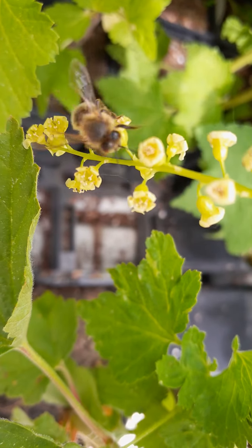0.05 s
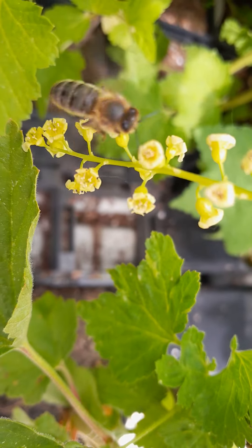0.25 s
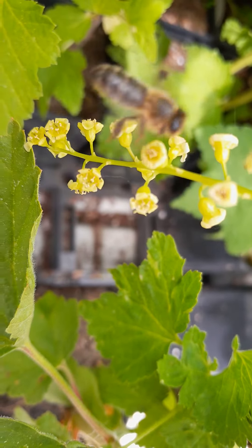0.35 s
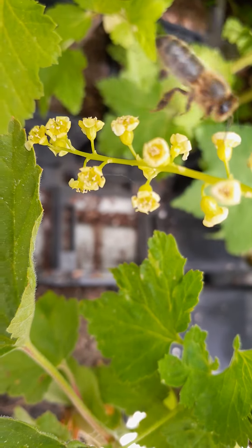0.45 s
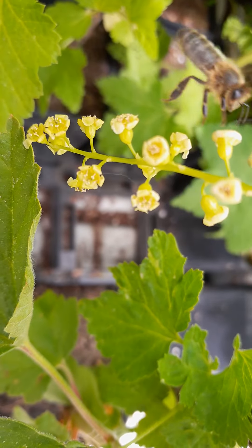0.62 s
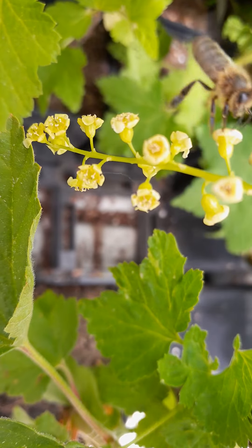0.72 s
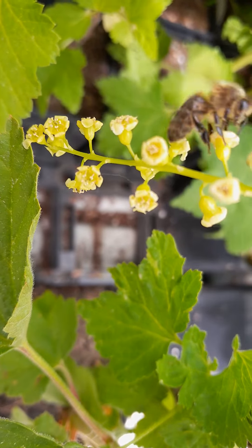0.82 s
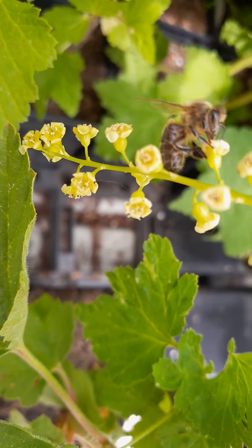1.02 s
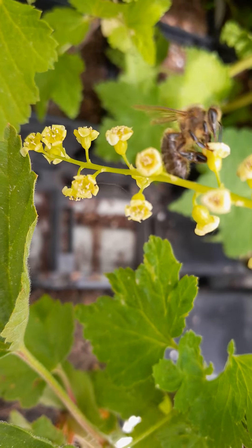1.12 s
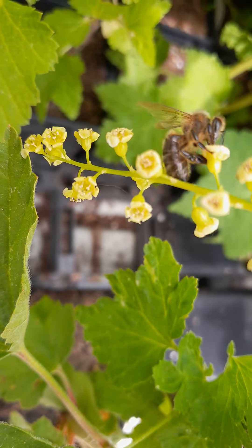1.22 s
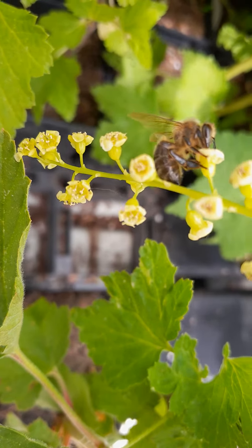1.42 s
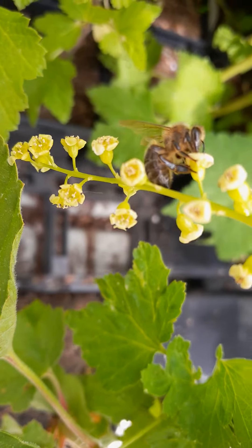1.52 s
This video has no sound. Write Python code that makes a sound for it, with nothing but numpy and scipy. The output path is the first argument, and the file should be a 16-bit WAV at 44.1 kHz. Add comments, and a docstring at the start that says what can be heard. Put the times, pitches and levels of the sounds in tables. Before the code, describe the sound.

A honeybee buzzes briefly up close on the left, with faint distant birds outdoors.

```python
"""A honeybee lifts off a flower, hovers for half a second right beside the left microphone and lands again.
Up close its wingbeats give a sawtooth buzz and blow a faint hiss over that microphone;
the right one, farther away, gets a thin buzz and little of the draught.
Far off to the right, birds whistle, tick and trill over a low outdoor rumble."""
import sys
import numpy as np
from scipy import signal
from scipy.fft import rfft, irfft
from scipy.io import wavfile

SR = 44100
rng = np.random.default_rng(int(sys.argv[2]) if len(sys.argv) > 2 else 0)


def transcribe(u):
    """Save the signal u as a 16-bit wav file named by the first command-line argument.

    u: samples, shape (n,) or (channels, n), limited to [-1, 1]; the rate is SR.
    q: integer samples, one column per channel.
    """
    v = np.clip(np.atleast_2d(u).T, -1, 1)
    q = np.round(v * 32767).astype(np.int16)
    wavfile.write(sys.argv[1], SR, q)


N = 68355
T = np.arange(N) / SR

# The bee's wingbeat. Each row: time in seconds, rate in Hz.
WINGBEAT = [(0.185, 247.8), (0.201, 251.9), (0.215, 245.6), (0.233, 270.4), (0.241, 252.9), (0.261, 260.3),
            (0.289, 257.1), (0.303, 244.8), (0.327, 262.2), (0.341, 266), (0.361, 250.7), (0.411, 257),
            (0.445, 244.7), (0.469, 264.8), (0.485, 246.4), (0.497, 259.2), (0.545, 253.4), (0.589, 259.5),
            (0.621, 256.7), (0.627, 248.9), (0.669, 259.6), (0.691, 247.7), (0.737, 254.2), (0.79, 249.3)]
# Buzz at the near microphone, with a last flick of the wings on landing.
# Each row: time in seconds, then levels of fundamental, octave and overtones in dB.
NEAR_BUZZ = [(.18, -87, -98, -105), (.192, -52, -55, -83), (.212, -51.5, -55, -88), (.228, -50, -56.5, -69),
             (.236, -45, -45.5, -73), (.248, -41.5, -46, -66), (.266, -39, -41.5, -58.5),
             (.286, -36.5, -41, -57), (.306, -41.5, -43.5, -55), (.342, -35, -41.5, -56.5),
             (.361, -40, -45.5, -64.5), (.378, -37, -41, -55), (.41, -35, -40.5, -57.5),
             (.448, -39, -43.5, -58), (.47, -37, -41.5, -56.5), (.49, -41.5, -44.5, -60),
             (.527, -39, -42.5, -56.5), (.575, -44, -45, -59.5), (.605, -43, -43.5, -56.5),
             (.628, -46.5, -47, -57.5), (.655, -41.5, -43.5, -56.5), (.703, -48.5, -47.5, -59.5),
             (.718, -47, -47.5, -59), (.742, -60, -47.5, -63), (.763, -78, -54, -72), (.797, -63, -55, -79),
             (.81, -68, -74, -92), (.82, -76, -56.5, -88), (.835, -76, -72, -90.5), (.87, -68.5, -75, -101),
             (.92, -100, -100, -110)]
# Its overtones. Each row: frequency in Hz, gain flying off in dB, gain turned to land in dB.
NEAR_OVERTONES = [(760, -2, -3.5), (1020, -6.5, -9), (1275, -7, -17), (1568, -1, -0.5), (1790, -9, -14),
                  (1990, -12, -16.5), (2320, -21.5, -21.5), (2575, -10.5, -10), (2780, -17, -19),
                  (3020, -20, -18), (3600, -59, -28)]
# Buzz at the far microphone. Each row: time in seconds, base level in dB.
FAR_BUZZ = [(.18, -106), (.195, -76), (.235, -83), (.278, -64.5), (.305, -78), (.335, -70), (.45, -75),
            (.6, -69), (.72, -70), (.8, -75), (.87, -81), (.92, -100)]
# Its partials. Each row: frequency in Hz, gain in dB.
FAR_PARTIALS = [(255, 5.5), (510, 0), (765, -8), (1020, -6), (1275, -5), (1530, -10), (1790, -14),
                (2300, -8.5), (2800, -25.5), (3600, -38)]
# Air blown over the near microphone. Each row: time in seconds, level in dB.
DRAUGHT = [(.18, -108), (.19, -63.5), (.23, -62), (.28, -59), (.41, -56), (.52, -57), (.67, -58),
           (.76, -60.5), (.875, -66), (.89, -73), (1.0, -84), (1.08, -100)]
# Brushes on the flower; a stalk-like tick and rustle.
# Each row: start in seconds, level in dB, decay in seconds.
BRUSHES = [(1.375, -65, 0.031), (1.406, -66.5, 0.052)]
STALK = [(1.468, -65, .002), (1.47, -82, .15)]
# Distant bird notes. Each row: start and length in seconds, first and target pitch in Hz,
# relative level in dB, warble depth in Hz.
WHISTLES = [(0.588, .13, 1900, 1994, -62.5, 151.2), (0.779, 0.11, 1760, 1840, -71, 109.7),
            (0.866, 0.066, 1900, 1956, -65.5, 79), (0.859, 0.15, 2294, 2260, -75.5, 119),
            (1.014, 0.079, 2048, 1940, -67, 35), (1.078, 0.085, 1895, 1699, -69, 70),
            (1.1, 0.051, 1960, 1941, -66, 30.17), (1.167, 0.089, 1790, 1588, -78.5, 48.7),
            (1.3, 0.1, 2420, 2155, -62, 40.6), (1.43, 0.036, 2258, 2110, -66, 39.6),
            (1.465, 0.037, 2100, 2200, -66.5, 60), (1.418, 0.12, 2365, 2706, -75, 80)]
# Sharp bird ticks. Each row: start in seconds, centre pitch in Hz, relative level in dB.
TICKS = [(.001, 5010, -59), (0.024, 5320, -59), (.043, 5270, -62), (0.064, 5340, -65), (0.12, 5800, -64),
         (0.316, 5700, -55.5), (0.326, 5430, -60), (0.91, 5320, -61.5), (0.938, 4860, -64),
         (0.953, 5080, -66)]
# Haze around the trill, and the outdoor rumble. Each row: time in seconds, relative level in dB.
TRILL_HAZE = [(1.45, -110), (1.468, -73), (1.51, -71), (1.55, -74)]
RUMBLE = [(0, -60), (.06, -61), (.17, -64.5), (.3, -64), (.55, -65.5), (.7, -59.5), (.83, -70.5),
          (.94, -62.5), (1.04, -67), (1.13, -64.5), (1.18, -74.5), (1.27, -72.5), (1.31, -66.5),
          (1.55, -65.5)]
# Noise spectra, from close by to far off. Each row: frequency in Hz, relative density in dB.
DRAUGHT_COLOUR = [(200, 16.5), (900, 8.5), (2000, -7), (3000, -12), (4500, -3), (6500, -4), (10000, 0),
                  (11100, 2), (11900, 6), (13100, 5), (14200, -5), (15700, 3)]
RASP_COLOUR = [(50, 3), (200, 11.5), (300, 14), (400, -17), (600, 2), (1200, 0.5), (1900, 1.5), (2900, -4),
               (3500, -9.5), (6000, -12.5)]
BRUSH_COLOUR = [(60, -0.5), (170, 1), (300, -2), (550, -11), (1200, -46), (4000, -44)]
STALK_COLOUR = [(1000, -15), (5000, 6), (12000, 5), (15700, 7)]
HAZE_COLOUR = [(2800, -20), (3800, 3), (5000, 1), (6500, -2), (7600, -15)]
RUMBLE_COLOUR = [(15, -15.5), (30, -21), (48, 0), (65, 1), (100, -4), (160, -12.5), (260, -18.5),
                 (500, -36), (1200, -48.5)]
AIR_COLOUR = [(40, 11.5), (250, 14), (500, 13), (1200, 6.5), (2000, 10.5), (3000, 0), (6000, 0),
              (15700, -3)]


def buzz_near(beats, partial, hz, turn_s=0.46, turning_s=0.12, full_stroke_s=0.261):
    """One partial of the wings' pressure sawtooth, close left; overtones shift as the bee turns to land."""
    fundamental_db, octave_db, upper_db = (curve(NEAR_BUZZ, column) for column in (1, 2, 3))
    turned = np.clip(.5 + (T - turn_s) / turning_s, 0, 1)
    colour_db = (1 - turned) * gain_at(NEAR_OVERTONES, hz) + turned * gain_at(NEAR_OVERTONES, hz, 2)
    shimmer_db = 1.46 * wander(rate_hz=79)
    overtone_db = upper_db + colour_db + shimmer_db
    if hz < 1100:  # low overtones swell partly with the fundamental
        overtone_db += 0.36 * (fundamental_db - upper_db)
    if hz > 1900:  # bright ones wait for the full stroke
        overtone_db -= 37 * np.clip((full_stroke_s - T) / 0.031, 0, 1)
    db = {1: fundamental_db, 2: octave_db}.get(partial, overtone_db)
    return amp(db) * np.sin(2 * np.pi * partial * beats)


def buzz_far(beats, partial, hz):
    """The same partial at the right microphone, where it fades and shifts in phase."""
    fading_db = 5.5 * wander(rate_hz=64)
    db = curve(FAR_BUZZ) + gain_at(FAR_PARTIALS, hz) + fading_db
    drift_cycles = 0.16 * wander(rate_hz=40)
    return amp(db) * np.cos(2 * np.pi * (partial * beats + drift_cycles))


def buzz(beats):
    """Fourteen harmonics of the wingbeat reach both microphones."""
    wing_hz = np.median(WINGBEAT, 0)[1]
    pair = np.zeros((2, N))
    for partial in range(1, 15):
        hz = partial * wing_hz
        pair += [buzz_near(beats, partial, hz), buzz_far(beats, partial, hz)]
    return np.sqrt(2) * pair


def draught(beats, far_db=-11):
    """Each wing stroke pushes an uneven puff of air at the microphones: a rasp with a fine hiss on top."""
    stroke = np.cos(2 * np.pi * beats)
    gusts = amp(2.0 * wander(rate_hz=740))
    hiss_gain = unit((1 + 0.18 * stroke) * gusts) * amp(curve(DRAUGHT))
    rasp_gain = unit(1 + 0.09 * stroke) * amp(curve(NEAR_BUZZ, 3) - 2.5)  # follows the overtones
    return np.array([amp(db) * (hiss_gain * noise(DRAUGHT_COLOUR) + rasp_gain * noise(RASP_COLOUR))
                     for db in (0, far_db)])


def landing():
    """Close on the left: a thin falling whistle as the wings stop, then rustles as the bee settles."""
    left = rustle(BRUSHES, BRUSH_COLOUR) + rustle(STALK, STALK_COLOUR)
    left += rough_tone(start_s=.87, length_s=.16, first_hz=11400, last_hz=10800, db=-84)
    return np.array([left, np.zeros(N)])


def rustle(bursts, colour):
    """Light touches on the flower: bursts of noise that die away."""
    envelope = sum(amp(db) * (T > start) * np.exp(-abs(T - start) / decay) for start, db, decay in bursts)
    return noise(colour) * envelope


def bird_whistle(length_s, first_hz, target_hz, db, warble_hz, slide_s=0.0392, rise_s=0.045, fall_s=0.0095):
    """A husky note slides towards its target pitch with a quick warble and a flutter in strength."""
    t = np.arange(0, length_s, 1 / SR)
    hz = target_hz + (first_hz - target_hz) * np.exp(-t / slide_s)
    hz += warble_hz * wander(rate_hz=170)[:len(t)]
    envelope = np.minimum(t / rise_s, 1) * np.minimum((length_s - t) / fall_s, 1)
    flutter = 1 + 0.29 * wander(rate_hz=270)[:len(t)]
    return amp(db) * unit(envelope * flutter * sine(hz))


def bird_tick(centre_hz, db, length_s=0.00344, sweep=0.38):
    """A downward chirp so steep that it sounds like a tick."""
    progress = np.arange(0, length_s, 1 / SR) / length_s
    hz = centre_hz * (1 + sweep * (1 - 2 * progress))
    return amp(db) * np.sin(np.pi * progress) * sine(hz)


def birds():
    """Distant song off to the right: whistles below, ticks and a rough trill above."""
    low = np.zeros(N)
    high = rough_tone(start_s=1.48, length_s=.06, first_hz=4400, last_hz=4150, db=-67)
    high += amp(curve(TRILL_HAZE)) * noise(HAZE_COLOUR)
    for start, *note in WHISTLES:
        add(low, start, bird_whistle(*note))
    for start, *note in TICKS:
        add(high, start, bird_tick(*note))
    return across_garden(low, left_db=-10) + across_garden(high, left_db=-11)


def across_garden(song, left_db, direct_db=-7, echo_db=-5, t60_s=0.47, echoes_per_s=1500):
    """Song arrives directly and as scattered echoes, different at each microphone."""
    t = np.arange(SR) / SR
    taps = rng.standard_normal((2, SR)) * (rng.random((2, SR)) < echoes_per_s / SR)
    taps *= np.exp(-np.log(1000) * t / t60_s)
    taps /= np.linalg.norm(taps, axis=1, keepdims=True)
    echoes = signal.fftconvolve(song[None], taps, axes=1)[:, :N]
    return (amp(direct_db) * song + amp(echo_db) * echoes) * amp([[left_db], [0]])


def outdoors(shared=0.85, air_db=-81, right_boost_db=3.5):
    """A swelling rumble, mostly shared by both microphones, and a thin steady hiss of open air."""
    rumble = np.sqrt(shared) * noise(RUMBLE_COLOUR)
    apart = np.sqrt(1 - shared) * np.array([noise(RUMBLE_COLOUR), noise(RUMBLE_COLOUR)])
    air = np.array([noise(AIR_COLOUR), amp(right_boost_db) * noise(AIR_COLOUR)])
    return amp(curve(RUMBLE)) * (rumble + apart) + amp(air_db) * air


def rough_tone(start_s, length_s, first_hz, last_hz, db, waver=.025):
    """A tone swells and fades, its pitch trembling as it glides."""
    progress = np.clip((T - start_s) / length_s, 0, 1)
    hz = (first_hz + (last_hz - first_hz) * progress) * (1 + waver * wander(rate_hz=170))
    return amp(db) * np.sin(np.pi * progress) * np.sqrt(2) * sine(hz)


def sine(hz):
    """A sine that follows a moving pitch."""
    return np.sin(2 * np.pi * np.cumsum(hz) / SR)


def amp(db):
    """Decibels to gain."""
    return 10 ** (np.asarray(db) / 20)


def unit(x):
    """Scales to rms 1."""
    return x / np.sqrt(np.mean(x ** 2) + 1e-20)


def curve(table, column=1):
    """One column of a time table, at every sample."""
    return np.interp(T, *np.transpose(table)[[0, column]])


def gain_at(spectrum, hz, column=1):
    """A spectrum's gain in dB, read on a log-frequency axis."""
    points_hz, db = np.transpose(spectrum)[[0, column]]
    return np.interp(np.log(hz + 1), np.log(points_hz), db)


def noise(colour):
    """Steady noise of a given spectrum."""
    gain = amp(gain_at(colour, np.fft.rfftfreq(N, 1 / SR)))
    return unit(irfft(rfft(rng.standard_normal(N)) * gain, N))


def wander(rate_hz):
    """Smooth random motion up to a rate."""
    gain = np.exp(-(np.fft.rfftfreq(N, 1 / SR) / rate_hz) ** 2)
    return unit(irfft(rfft(rng.standard_normal(N)) * gain, N))


def add(mix, start_s, sound):
    """Mixes a sound in at a time."""
    part = mix[max(round(start_s * SR), 0):][:len(sound)]
    part += sound[:len(part)]


def scene():
    """Up close, one slightly unsteady wingbeat drives buzz and draught; birds and rumble lie behind."""
    wing_hz = curve(WINGBEAT) * (1 + 0.00974 * wander(rate_hz=122))
    beats = np.cumsum(wing_hz) / SR
    return buzz(beats) + draught(beats) + landing() + birds() + outdoors()


def record(dry):
    """Both microphones pass through the recorder's band limit."""
    cutoff_hz = 15720
    lowpass = signal.firwin(511, cutoff_hz, window=("kaiser", 9), fs=SR)
    return signal.oaconvolve(dry, lowpass[None], "same")


dry = scene()
out = record(dry)
transcribe(out)
```